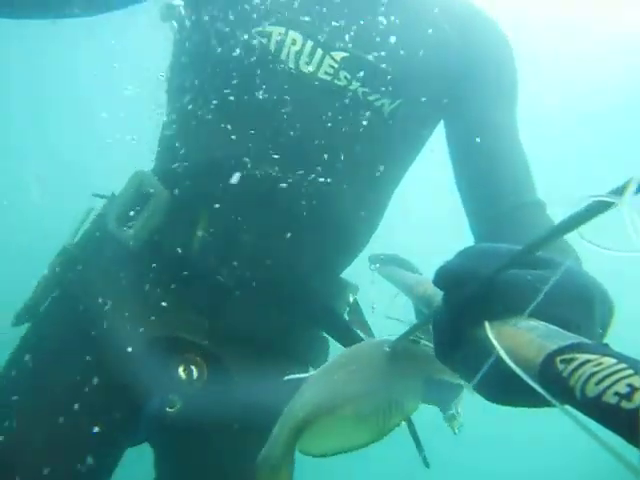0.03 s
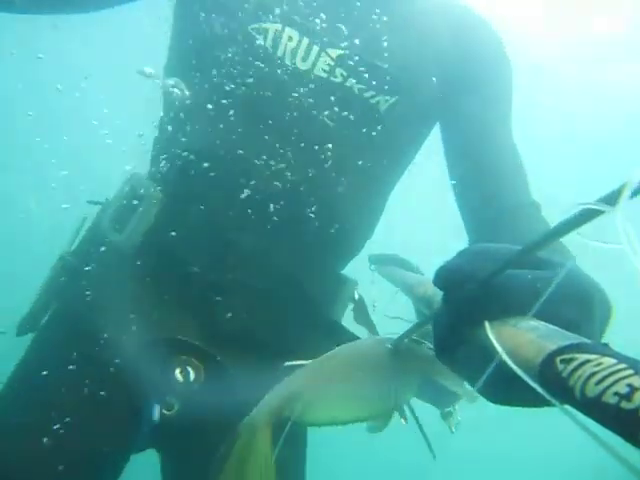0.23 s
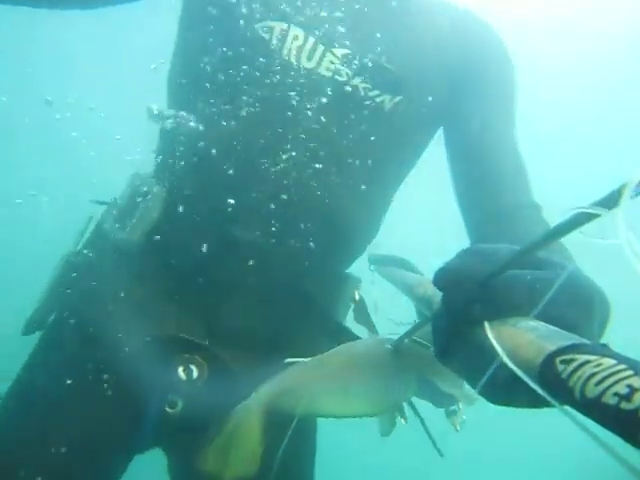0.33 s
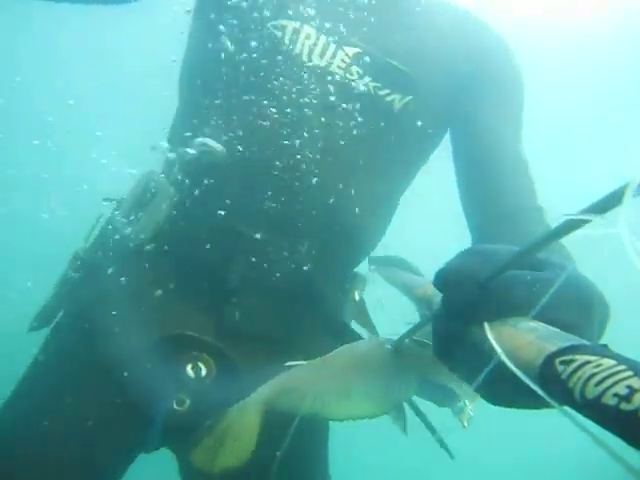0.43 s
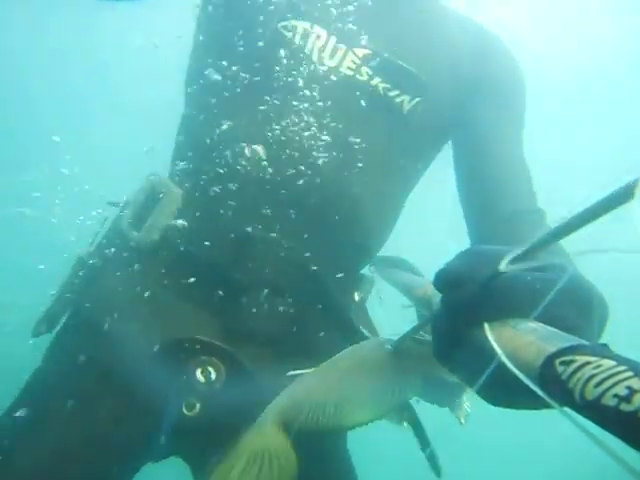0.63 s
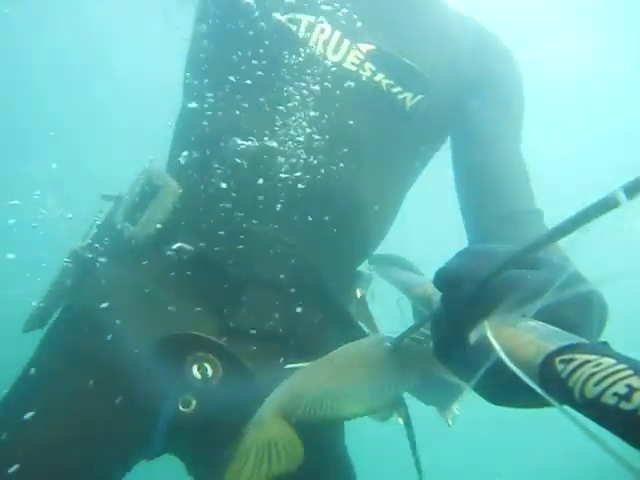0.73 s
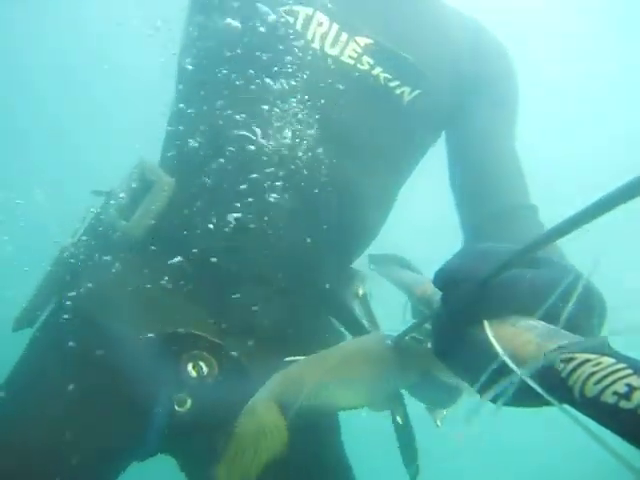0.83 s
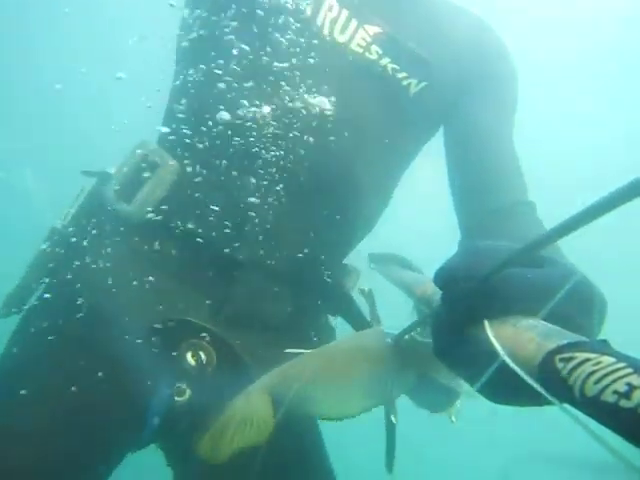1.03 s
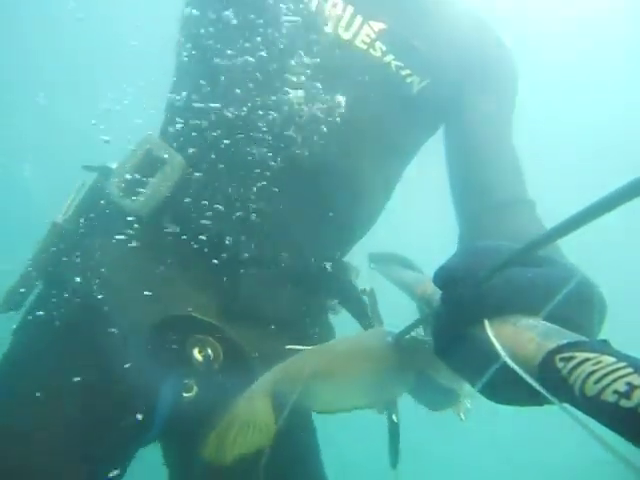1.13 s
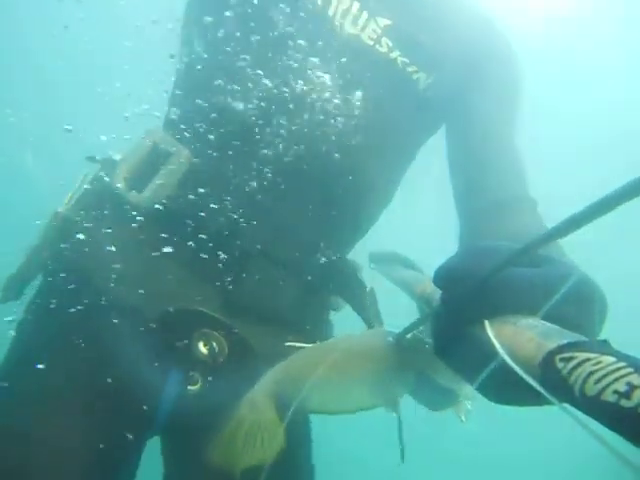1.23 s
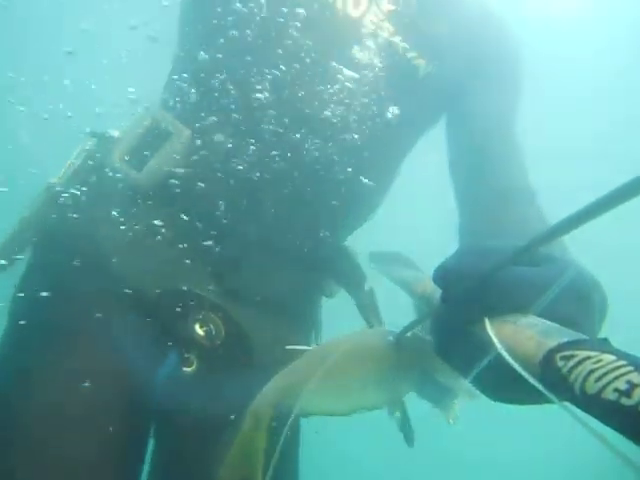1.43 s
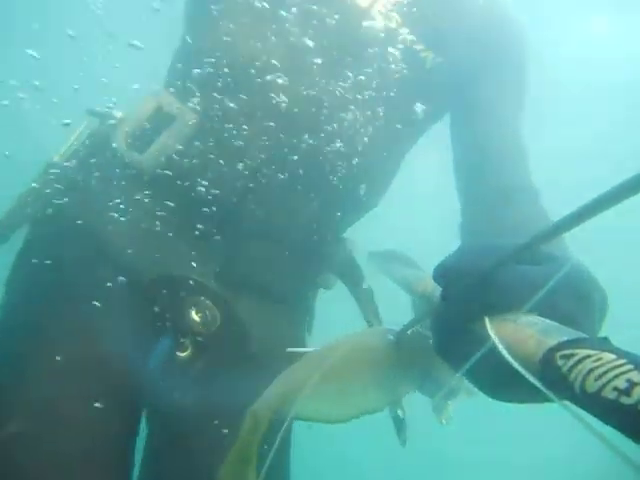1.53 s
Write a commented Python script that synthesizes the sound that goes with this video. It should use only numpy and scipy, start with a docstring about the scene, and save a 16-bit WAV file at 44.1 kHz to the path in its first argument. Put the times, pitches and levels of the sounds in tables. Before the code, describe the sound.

Sharp snapping knocks hit a sealed camera housing underwater, a heavy thumping snap then a lighter click, twice over. Very faint hiss, low water sway, a weak wavering hum and tiny crackles surround them.

```python
"""Under water, faint hiss, a low sway, a wavering hum and tiny far crackles come first.
Then something sprung snaps against the sealed camera housing: in and out, twice.
Each snap squeezes the air inside, which shakes the wall modes, and its hard contacts ring the shell.
The microphone lets the pressure leak away; the hum, a drifting sine, dies around the second snap in.
Crackles (resonant noise ticks), sway and hiss (both shaped noise) carry on to the end."""
import sys
import numpy as np
from scipy import signal
from scipy.io import wavfile
from scipy.ndimage import uniform_filter1d

SR = 44100
rng = np.random.default_rng(int(sys.argv[2]) if len(sys.argv) > 2 else 0)


def level_to_linear(level):
    """Convert decibel levels to linear amplitude factors, elementwise."""
    exponent = np.asarray(level, float) / 20
    return 10 ** exponent


def wrap_up_sound(samples):
    """Save the sound to the file named by the first command line argument, as 16-bit audio."""
    columns = np.atleast_2d(samples).T
    # keep every value between -1 and 1, then stretch to whole-number steps
    tamed = np.clip(columns, -1, 1)
    steps = np.round(tamed * 32767).astype(np.int16)
    wavfile.write(sys.argv[1], SR, steps)


N = 70560  # length in samples


def pressure(rows):
    """Superposition: S-shaped pressure steps add, each a logistic curve raised to a power."""
    t = np.arange(N) / SR
    air = np.zeros(N)
    for start_s, level_db, rise_ms, abruptness in rows:
        steps = np.clip((t - start_s) * 1000 / rise_ms, -80, 40)
        air += level_to_linear(level_db) / (1 + np.exp(-steps)) ** abruptness
    return air - air[0]


def ring(x, hz, t60):
    """Damped resonance: a two-pole filter turns a unit click into a unit decaying sine."""
    radius = 1000. ** (-1 / (t60 * SR))  # 60 dB down after t60 seconds
    turn = 2 * np.pi * hz / SR
    return signal.lfilter([0, radius * np.sin(turn)], [1, -2 * radius * np.cos(turn), radius ** 2], x)


# Squeezes of the trapped air going in (slow lean, then snap):
# t/s, pressure level/dB, rise time constant/ms, abruptness of the start/1
AIR_IN = [(0.20744, -12, 0.76, 3.1), (0.20948, -8.5, 0.53, 26.54), (0.90609, -11.5, 0.82, 1.362),
          (0.90854, -9, 0.5, 10.7)]
# Squeezes coming out (snap, then a bounce): same columns
AIR_OUT = [(0.44394, -12, 0.12, 0.23), (0.45744, -12, 0.34, 3.1), (1.1503, -13, 0.13, 0.27),
           (1.1893, -13, 0.24, 0.47)]
# Slow wall modes moved by a squeeze: f/Hz, t60/s, share going in/1, share coming out/1
WALL_MODES = [(480, 0.011, 0.55, 0.49), (510, 0.083, -0.01, 0.0075), (582.7, 0.0272, 0.53, 0.21),
              (1112.5, 0.01476, 8.5, -0.6), (1150, 0.0091, 3, 3), (1372, 0.00216, -17.5, -3)]


def squeezes():
    """Modal excitation: the rate of change of the air pressure drives the damped wall modes."""
    going, coming = pressure(AIR_IN), pressure(AIR_OUT)
    speed_in, speed_out = np.diff(going, prepend=0), np.diff(coming, prepend=0)
    total = going + coming
    for hz, t60, share_in, share_out in WALL_MODES:
        total = total + ring(share_in * speed_in + share_out * speed_out, hz, t60)
    return total


def contacts(rows):
    """Impulse: each contact is a short Gaussian force of set area, followed by one rebound."""
    rebound_s, rebound_db = .00123, -7
    t, force = np.arange(N) / SR, np.zeros(N)
    for start_s, level_db, contact_ms in rows:
        for late_s, less_db in ((0, 0), (rebound_s, rebound_db)):
            pulse = np.exp(-.5 * ((t - start_s - late_s) * 1000 / contact_ms) ** 2)
            force += level_to_linear(level_db + less_db) * pulse / (pulse.sum() + 1e-9)
    return force


# Hard contacts going in: t/s, impulse level/dB, contact time (Gaussian width)/ms
HITS_IN = [(0.21045, -24, 0.05463), (0.909, -25, 0.053)]
# Hard contacts coming out: same columns
HITS_OUT = [(0.44271, -32.5, 0.052), (0.45693, -47, 0.05081), (0.46791, -60, 0.04159),
            (1.1491, -33.5, 0.056), (1.1883, -34.5, 0.16)]
# Shell modes: f/Hz, t60/s, level going in/dB, level coming out/dB
SHELL_MODES = [(1713, 0.00877, -15.5, -4), (1901.8, 0.003, -6, 5.5), (2161.2, 0.01478, -15, -6.5),
               (2720, 0.0088, -16, -14), (2932, 0.0092, -12, -14), (3510, 0.0228, -21, -13),
               (4446, 0.011, -8, -16.5), (5220, 0.019, -17.5, -12.916), (5966, 0.01187, -14, -10.5),
               (6840, 0.013, -7.0225, -3.9305), (7980, 0.0091, -7.4053, -15.5),
               (8571.7, 0.01847, -0.7, 1.9), (9270, 0.01617, 2, -2.5)]


def shell():
    """Modal superposition: the same modes answer both kinds of contact, neighbours in opposite sense."""
    going, coming = contacts(HITS_IN), contacts(HITS_OUT)
    total = np.zeros(N)
    for k, (hz, t60, in_db, out_db) in enumerate(SHELL_MODES):
        force = level_to_linear(in_db) * going + level_to_linear(out_db) * coming
        total += (-1) ** k * ring(force, hz, t60)
    return total


def evened(x):
    """Normalization: scales a signal to unit root mean square."""
    return x / np.sqrt(np.mean(x ** 2) + 1e-20)


# Far crackles: t/s, level of the first 90 samples/dB, f/Hz
FAR_CRACKLES = [(.028, -77.5, 2140), (0.2604, -72, 7300), (.283, -80.5, 2300), (.311, -79, 6000),
                (.380, -73.5, 4720), (.4095, -72, 2680), (0.4264, -75, 9000), (0.554, -72, 2733),
                (.692, -76.5, 3016), (.765, -78, 1805), (.821, -75.5, 1800), (0.849, -79, 1980),
                (.870, -72.5, 2630), (.885, -72.5, 8400), (.893, -80, 2200), (1.056, -75, 1820),
                (1.062, -75, 4700), (1.118, -79, 7200), (1.262, -72, 6500), (1.357, -78.5, 2500),
                (1.365, -75.5, 5960)]
# Pass band of the ticks: lower and upper edge f/Hz
TICK_EDGES = [1700, 9960]


def crackles():
    """Resonant coloration: short noise ticks, each ringing near its pitch, with fainter ones at random."""
    faint_per_s, faint_db, spread_db = 58, -87., 8.5
    tick_s, ring_s, tail_s, tail_db = .0011, .005, .006, -11.
    length = 900  # samples per tick
    draws = rng.random((round(faint_per_s * N / SR), 3))
    faint = [(u * N / SR, faint_db + spread_db * v, 1600 * 5.5 ** w) for u, v, w in draws]
    t, out = np.arange(length) / SR, np.zeros(N + length)
    shape = np.exp(-t / tick_s) + level_to_linear(tail_db) * np.exp(-t / tail_s)
    band = signal.butter(2, TICK_EDGES, "bandpass", fs=SR)
    for start_s, level_db, hz in FAR_CRACKLES + faint:
        burst = signal.lfilter(*band, rng.standard_normal(length) * shape)
        tick = evened(ring(burst, hz, ring_s)) + evened(burst)
        out[round(start_s * SR):][:length] += level_to_linear(level_db) * tick / np.std(tick[:90])
    return out[:N]


# Wavering hum: t/s, f/Hz, level before flutter/dB
HUM_PATH = [(0., 377.6, -88), (.04, 343, -89), (.12, 384.3, -93), (.17, 386, -87.5), (0.271, 368, -84.5),
            (.31, 350, -94), (.34, 363.6, -80), (.42, 385.7, -92), (.52, 410.8, -83), (.585, 405, -85),
            (.615, 346, -82.5), (.66, 362, -82), (.72, 349, -94.5), (.76, 360, -90.5), (.88, 350, -87)]


def hum():
    """Frequency modulation: the phase of a sine sums its drifting pitch; its level flutters and fades."""
    t, (s, hz, db) = np.arange(N) / SR, np.transpose(HUM_PATH)
    flutter = evened(uniform_filter1d(rng.standard_normal(N), size=900))
    fade_db = 240 * np.maximum(t - s[-1], 0)  # 240 dB per second after the last point
    level = level_to_linear(np.interp(t, s, db) + 2.5 * flutter - fade_db)
    phase = 2 * np.pi * np.cumsum(np.interp(t, s, hz)) / SR
    return np.sqrt(2) * level * np.sin(phase)


def noise(spectrum, patchy_db):
    """Spectral shaping: random short-time spectra with drifting patches, resynthesized at rms 1."""
    hz = np.fft.rfftfreq(2048, 1 / SR)
    real, imag, patches = rng.standard_normal((N // 512 + 9, 1025, 3)).T
    patches = uniform_filter1d(patches, size=4, axis=0)  # across frequency
    patches = evened(uniform_filter1d(patches, size=5, axis=1))  # across time
    f, db = np.transpose(spectrum)
    shape_db = np.interp(np.log(hz + 1), np.log(f), db, left=-60)
    z = (real + 1j * imag) * level_to_linear(shape_db[:, None] + patchy_db * patches)
    return evened(signal.istft(z, nperseg=2048, noverlap=1536)[1][1024:N + 1024])


# Spectrum of the moving water: f/Hz, relative level per Hz/dB
WATER_SPECTRUM = [(12, 4.5), (25, 1.5), (45, -10.5), (140, -20.5), (240, -22), (355, -22.5), (500, -21.5),
                  (630, -23), (760, -35.5), (1500, -55)]
# How strongly the water stirs: t/s, level/dB
WATER_STIR = [(0., -68.5), (.08, -74), (.17, -72.5), (.3, -72), (.6, -73), (.85, -72.5), (.98, -73),
              (1.07, -70.5), (1.2, -75), (1.4, -75.5), (1.6, -76.5)]


def water():
    """Amplitude modulation: low-pitched noise sways with the stirring of the water."""
    level_db = np.interp(np.arange(N) / SR, *np.transpose(WATER_STIR))
    return level_to_linear(level_db) * noise(WATER_SPECTRUM, patchy_db=2.5)


# Spectrum of the steady hiss: f/Hz, relative level per Hz/dB
HISS_SPECTRUM = [(300, -12), (800, 1.5), (1450, 0.5), (2000, 0), (8500, -2), (10500, -6.5), (12000, -12.5)]


def hiss():
    """Stationary noise: a shaped spectrum held at a steady -83 dB."""
    return level_to_linear(-83.) * noise(HISS_SPECTRUM, patchy_db=.6)


# Pressure leaks of the microphone: corner f/Hz
LEAK_CORNERS = [22.7, 9.37, 1.55]


def leak(x):
    """Pressure equalization: first-order high-passes in series drain the steady pressure."""
    for hz in LEAK_CORNERS:
        x = signal.lfilter([1, -1], [1, -np.exp(-2 * np.pi * hz / SR)], x)
    return x


def scene():
    """Linear superposition: all sources under water add as one channel of pressure."""
    return np.array([squeezes() + shell() + crackles() + hum() + water()])


def roll_off(x):
    """The treble ends steeply here."""
    return signal.sosfilt(signal.butter(12, 10720, fs=SR, output="sos"), x)


def record(dry):
    """Band limitation: the leaked pressure and the hiss pass a linear-phase low-pass at 10.9 kHz."""
    mix = leak(dry) + hiss()
    low_pass = signal.firwin(255, 10900, window=("kaiser", 7), fs=SR)
    mix = signal.oaconvolve(mix, low_pass[None], "same")
    return roll_off(mix)


dry = scene()
out = record(dry)
wrap_up_sound(out)
```